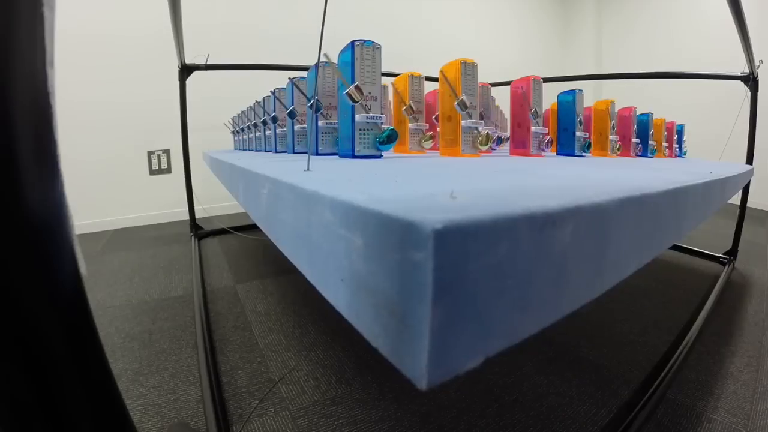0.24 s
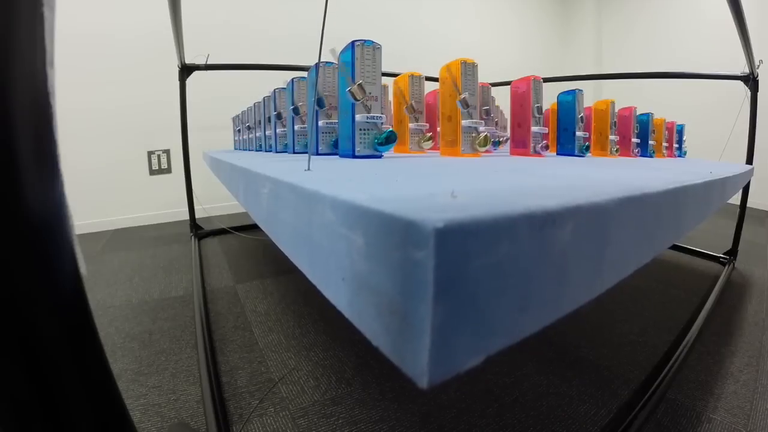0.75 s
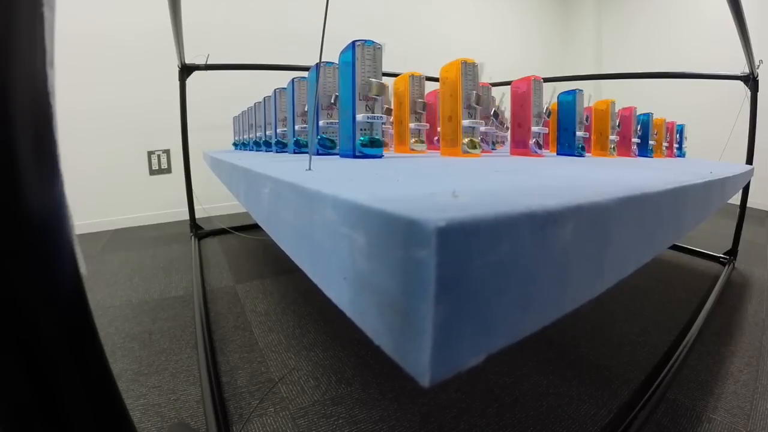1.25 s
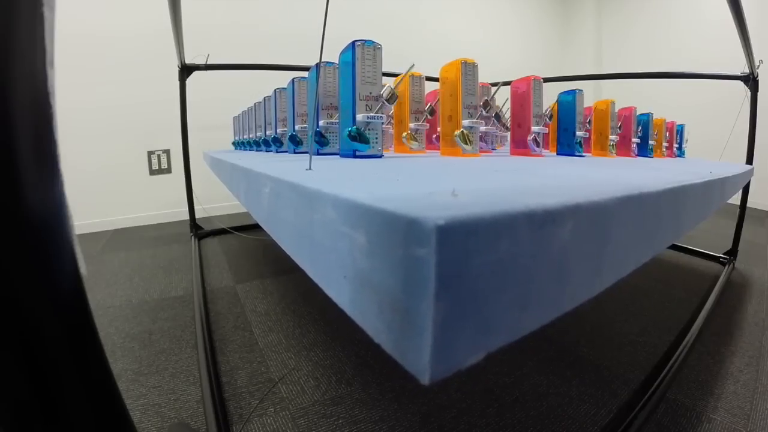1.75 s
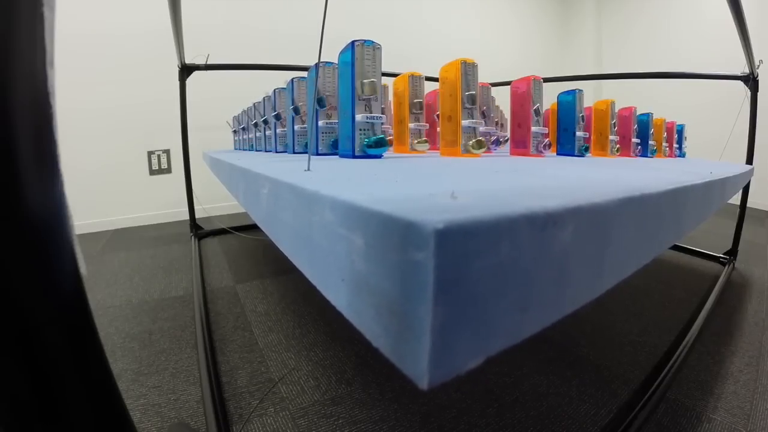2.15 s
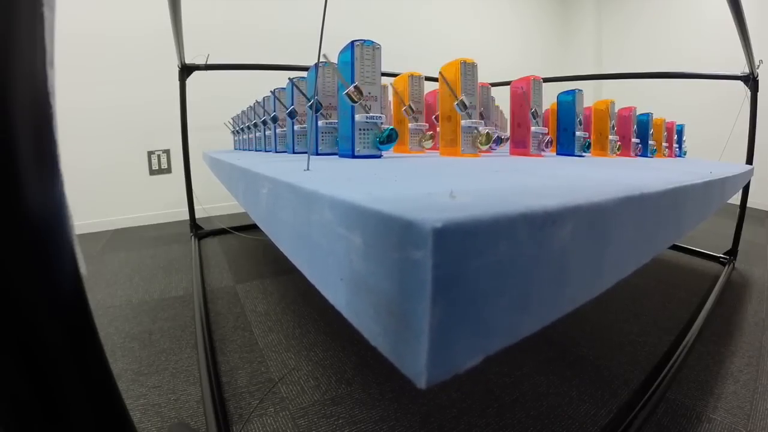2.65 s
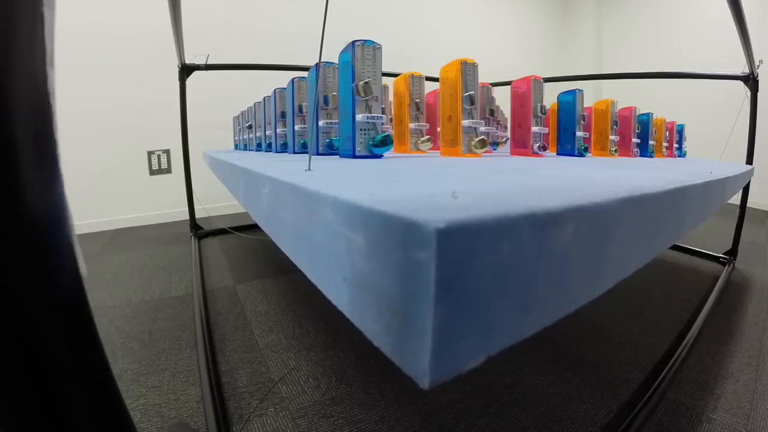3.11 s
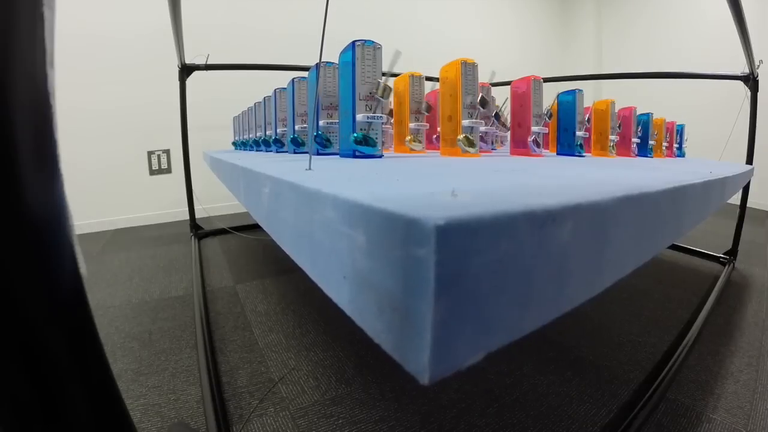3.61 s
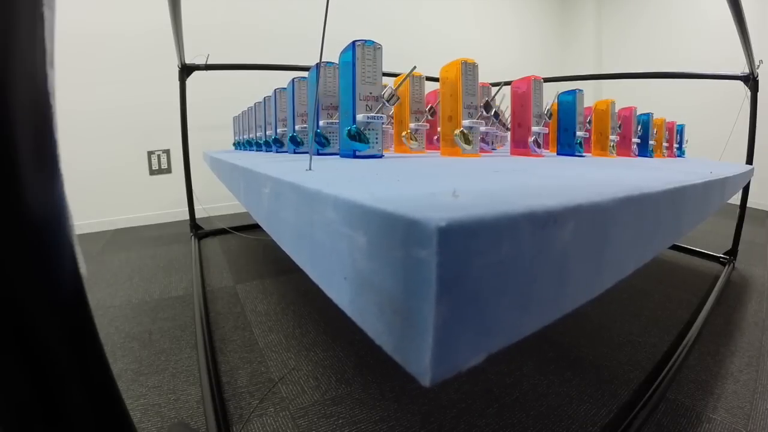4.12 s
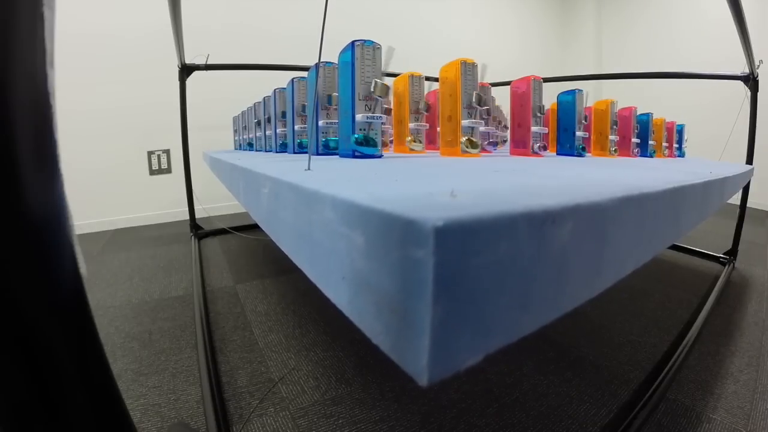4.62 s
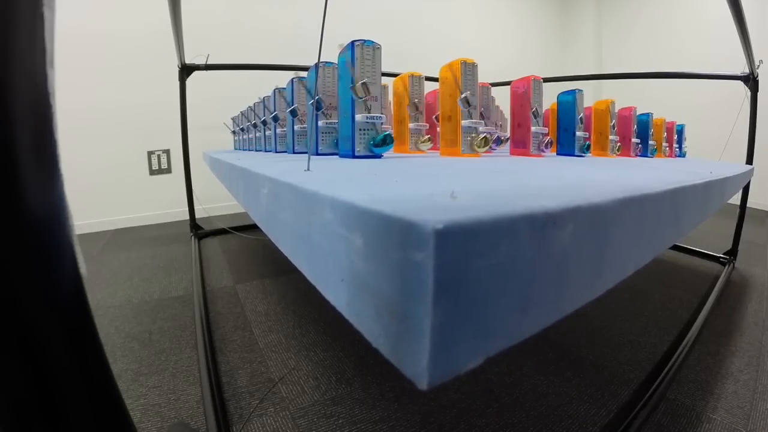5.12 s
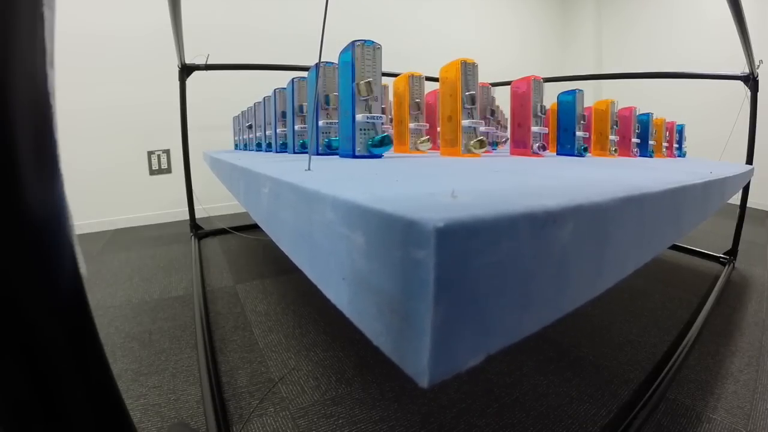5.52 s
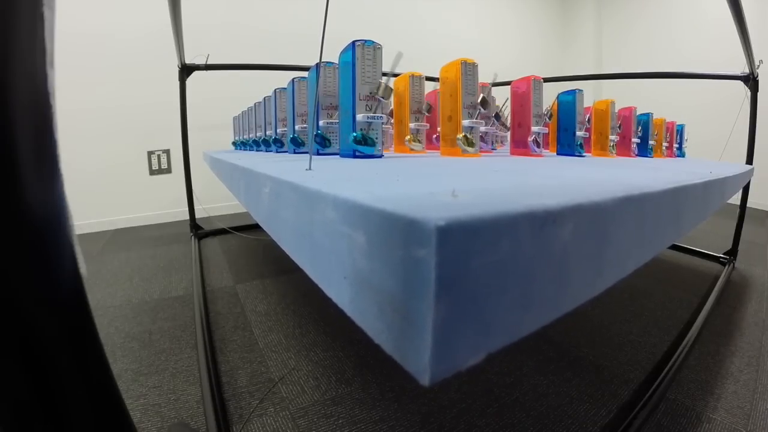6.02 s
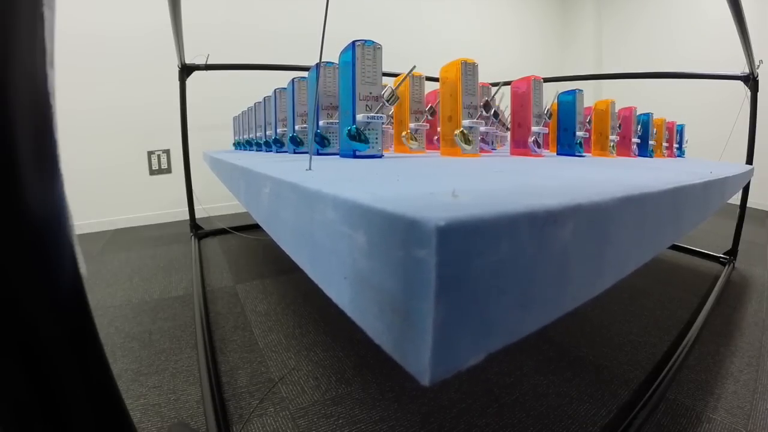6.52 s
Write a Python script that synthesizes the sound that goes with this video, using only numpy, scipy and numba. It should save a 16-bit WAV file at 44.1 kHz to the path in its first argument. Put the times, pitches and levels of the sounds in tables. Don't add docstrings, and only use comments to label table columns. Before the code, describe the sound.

Rows of small plastic pendulum metronomes on a hanging foam board tick nearly together, just over three beats a second. Each beat is a short clattering roll: a leading click, a dense crowd of ticks, then a lone straggler. Alternate beats differ slightly in leading accent. Close stereo microphones catch bright, dry clacks with short room echoes and soft ventilation noise beneath.

```python
import sys
import numpy as np
from scipy import signal
from scipy.fft import rfft, irfft, next_fast_len
from scipy.io import wavfile
from scipy.ndimage import uniform_filter1d, minimum_filter1d
from numba import njit

SR = 44100
rng = np.random.default_rng(int(sys.argv[2]) if len(sys.argv) > 2 else 0)


def attenuation_scalar(level_db):
    decades = np.asarray(level_db, float) / 20
    return 10 ** decades


def persist_wave(psi):
    counts = np.round(np.clip(psi, -1, 1) * 32767).astype(np.int16)
    wavfile.write(sys.argv[1], SR, np.atleast_2d(counts).T)


N = 297675
LEAD_IN = 4410

# leader_start_s, crowd_level_db, leader_level_db
BEATS = [(-0.0843, -13.5, -22), (0.2115, -14, -18), (0.5173, -13, -9.5), (0.815, -13, -16),
         (1.1205, -13.5, -8), (1.4185, -13, -12), (1.7216, -13.5, -10), (2.0194, -13.5, -19),
         (2.3248, -14, -10), (2.6218, -13.5, -18), (2.927, -13, -8.5), (3.2234, -13, -15.5),
         (3.5281, -13, -8.5), (3.8257, -12.5, -12.5), (4.1306, -13.5, -11), (4.4284, -12.5, -16),
         (4.731, -13, -12), (5.0283, -12.5, -15.5), (5.3345, -13.5, -6.5), (5.6305, -14.5, -16),
         (5.9377, -13.5, -8), (6.2335, -13, -14.5), (6.539, -13, -8)]
# after_leader_s, level_db
CROWD_SWELL = [
    (.018, -4.5),
    (0.033, -2),
    (.05, 0),
    (.095, -1.5),
    (.115, -3.5),
    (0.127, -4.5),
    (.138, -9.5),
]
# start_s, level_db
NEAREST = [(0.0005, -6.5), (0.2248, -5), (0.526, -6), (0.8223, -6.5), (1.127, -6), (1.434, -5),
           (1.7299, -5.5), (2.0331, -5), (2.3327, -4.5), (2.636, -6), (2.9326, -5), (3.2384, -5),
           (3.5383, -4.5), (3.8402, -4.5), (4.142, -3.5), (4.4367, -6), (4.7377, -5.5), (5.0392, -9.5),
           (5.3465, -7.5), (5.6418, -10.5), (5.9484, -3.5), (6.2428, -8), (6.5498, -3.5)]
# start_s, level_db
STRAGGLER = [(0.0494, -16), (0.3409, -9), (0.6515, -13), (0.945, -13.5), (1.2521, -17), (1.546, -17),
             (1.8523, -14), (2.149, -10), (2.455, -12), (2.753, -9), (3.0583, -19), (3.3548, -9),
             (3.6595, -12), (3.9567, -9.5), (4.2637, -11), (4.5596, -11), (4.8651, -13), (5.161, -11.5),
             (5.463, -8.5), (5.764, -10), (6.0722, -13.5), (6.365, -9.5), (6.6744, -12)]
# after_leader_s, slip_s_per_s, level_db, cavity_ring_db
SWING_RIGHT = [(.018, 0.0008, -7, -13), (.023, 0.00053, -13.5, -3), (.029, .0003, -21, 2),
               (.037, .0002, -14.5, -12.5), (.044, .0002, -8, -5), (.053, .0002, -12, 1),
               (.062, 0.00022, -16, 2), (.082, .0002, -7, -6.5), (.089, .0002, -12, -6),
               (.1, 0.00018, -12.5, -12), (.11, .0002, -14, -8.5), (.126, .0002, -17, -10.5),
               (.171, 0.00022, -30, 8)]
# after_leader_s, slip_s_per_s, level_db, cavity_ring_db
SWING_LEFT = [(.008, 0.001, -11, -5), (.021, 0.0032, -10.5, -6), (.027, .0003, -16, -3),
              (.031, -0.0048, -13, -8), (.043, .0002, -9, -3.5), (.049, -.0003, -13.5, -3.5),
              (.058, .0002, -12.5, -3), (.074, .0002, -11.5, 0.5), (.084, .0002, -12.5, -6),
              (.092, .0002, -9.5, -12), (.102, .0002, -12, -6), (.112, .0002, -15, -8),
              (.122, .0002, -21.5, -10), (.174, .0001, -28.5, 8.5)]
# pitch_hz, level_db, t60_s
CASE_MODES = [(2350, -6, .03), (2780, -2, .03), (3300, -2, .025), (3850, -3, .025), (4400, -5, .02),
              (4900, -5, .02), (5500, -7, .02), (6100, -4, .02), (6750, -4, .02), (8450, -5, .009),
              (9300, -10, .008)]
# pitch_hz, level_db, t60_s
COMMON_CAVITY = (1860, 5.24, 0.06)
# pitch_hz, level_db, t60_s, thinning_out_s
DEEP_CAVITY = (1590, 0.92, 0.16, 0.057)
# freq_hz, level_db
CRACK = [(200, -58), (550, -13.5), (1100, -23.5), (2000, -3), (3500, -6), (6800, -8.5), (7700, -13.5),
         (8500, -10.5), (11900, -29), (16000, -41)]
# freq_hz, gain_db
REACH = [(40, -46), (130, -23), (260, -7.5), (500, -3.5), (14000, 1.5), (16000, -10)]
# freq_hz, level_db, t60_s, side_minus_mid_db
ROOM = [(60, 5, .6, -32), (157, 11, 1, -31), (314, 6, 0.88, -23), (548, 9, 0.51, -16.5),
        (1034, -3, 0.41, -9.5), (1930, -0.5, 0.33, -7.5), (3140, 1, 0.28, -10.5), (5140, -3.5, 0.27, -14),
        (8500, -0.5, 0.17, -7.5), (12100, 2.5, 0.18, -13.5)]
# freq_hz, level_db_per_hz
AIR = [(25, -22), (40, -22), (56, 0.5), (100, -2.5), (160, 1), (300, 3.5), (600, -12.5), (1500, -10),
       (5000, -12), (16000, -29.5)]
# centre_s, pitch_hz, level_db, half_length_s
THUDS = [
    (3.22, 92, -44.5, 0.081),
    (3.4, 99, -53, 0.044),
    (4.145, 60, -51.5, 0.063),
    (6.497, 54.9, -53, 0.075),
]


def colour(x, hz, db):
    size = next_fast_len(x.shape[-1])
    f = np.maximum(np.fft.rfftfreq(size, 1 / SR), 1)
    gain = attenuation_scalar(np.interp(np.log(f), np.log(hz), db))
    return irfft(rfft(x, size) * gain, size)[..., :x.shape[-1]]


def front_row(beat_s, row):
    wander_s, wander_db, wander_ring_db = .0015, 2, 3
    late_s, slip, db, ring_db = np.transpose(row)
    chance = np.clip(rng.standard_normal((len(beat_s), 3, len(row))), -2, 2)
    drift_s = slip * (beat_s[:, None] - beat_s.mean())
    s = beat_s[:, None] + late_s + drift_s + wander_s * chance[:, 0]
    level_db = db + wander_db * chance[:, 1]
    cavity_db = ring_db + wander_ring_db * chance[:, 2]
    return np.c_[s.ravel(), level_db.ravel(), cavity_db.ravel()]


def roll(count=44):
    beat_s, crowd_db, leader_db = np.transpose(BEATS)
    leaders = np.c_[beat_s + .0003, leader_db - 2.5, -5.0 - leader_db]

    nearest = np.c_[NEAREST, np.full(len(NEAREST), -8.5)]
    straggler = np.c_[STRAGGLER, np.full(len(STRAGGLER), -2.5)]
    right = front_row(beat_s[::2], SWING_RIGHT)
    left = front_row(beat_s[1::2], SWING_LEFT)
    loud = np.r_[nearest, straggler, right, left] + [-.0004, -3.0, 6.0]

    late_s, late_db = np.transpose(CROWD_SWELL)
    chance = rng.standard_normal((len(beat_s), 2, count))
    place = np.linspace(late_s[0], late_s[-1], count) + .003 * chance[:, 0]
    place = np.clip(place, late_s[0], late_s[-1])
    db = crowd_db[:, None] - 0.5 + np.interp(place, late_s, late_db) + 0.78 * chance[:, 1]
    crowd = np.c_[(beat_s[:, None] + place).ravel(), db.ravel(), np.zeros(db.size)]

    ticks = np.r_[leaders, loud, crowd]
    own_beat = np.searchsorted(beat_s, ticks[:, 0]) - 1
    return np.c_[ticks, ticks[:, 0] - beat_s[own_beat]]


@njit
def ring(start, size, share, turn, length, total):
    out = np.zeros((total, share.shape[1]))
    for j in range(len(start)):
        for m in range(len(length)):
            z = size[j, m] + 0j
            for i in range(start[j], min(start[j] + length[m], total)):
                for path in range(share.shape[1]):
                    out[i, path] += share[j, path] * z.imag
                z *= turn[j, m]
    return out.T


def metronomes(rattle_s=.0009, count=3, channels=3):
    s, db, ring_db, late = roll().T
    total = N + LEAD_IN
    leaders = len(BEATS)
    hz, mode_db, t60 = np.transpose(CASE_MODES + [COMMON_CAVITY, DEEP_CAVITY[:3]])

    own = rng.standard_normal((len(s), 2, len(hz)))
    own[:leaders, :, -2:] *= 0.53
    pitch_spread = np.r_[np.full(len(CASE_MODES), .05), .022, .025]
    level_spread_db = np.r_[np.full(len(CASE_MODES), 3.5), 1.5, 1.5]
    pitch = hz * (1 + pitch_spread * own[:, 0])
    pitch[:, -1] *= 1 + 0.62 * late
    turn = np.exp(2j * np.pi * pitch / SR - np.log(1000) / (t60 * SR))
    turn[:leaders, -1] *= attenuation_scalar(-60 / (.08 * SR))

    level_db = db[:, None] + mode_db + level_spread_db * own[:, 1]
    level_db[:, -1] += ring_db - 10.6 * late / DEEP_CAVITY[3]
    level_db[:, -2] += ring_db - 12 * np.exp(-late / 0.0028)

    bounce = rng.random((len(s), count, 2))
    order = np.arange(count)
    blow_s = s[:, None] + rattle_s * (order + bounce[..., 0] * (order > 0))
    blows = LEAD_IN + (SR * blow_s).astype(int)
    strength = attenuation_scalar(-3.0 * order) * np.sign(bounce[..., 1] - .5)
    size = strength[..., None] * attenuation_scalar(level_db - 12.5)[:, None]
    size[:, 1:, -2:] *= attenuation_scalar(-11)
    size[..., -2:] *= attenuation_scalar(2.24)
    size = size.reshape(-1, len(hz))

    share = np.c_[np.ones(len(s)), np.sign(rng.standard_normal((len(s), channels - 1)))]
    share = np.repeat(share, count, axis=0)
    turn = np.repeat(turn, count, axis=0)
    length = (.9 * t60 * SR).astype(int)
    cases = ring(blows.ravel(), size, share, turn, length, total)

    blow_power = attenuation_scalar(2 * db)[:, None] * strength ** 2
    power = np.bincount(blows.ravel(), blow_power.ravel(), total + SR)[:total]
    envelope = np.sqrt(signal.lfilter([1], [1, -np.exp(-1 / (0.0012 * SR))], power))
    crack = colour(envelope * rng.standard_normal(cases.shape), *np.transpose(CRACK))
    return colour(cases + attenuation_scalar(10.0) * crack, *np.transpose(REACH))


def room(paths, length_s=.45, build_s=0.0015):
    hz, db, t60, side_db = np.transpose(ROOM)
    t = np.arange(int(length_s * SR)) / SR
    log_f = np.log(np.maximum(np.fft.rfftfreq(len(t), 1 / SR), 1))
    noise = rfft(rng.standard_normal((len(paths), 2, len(t))))
    echoes = 0
    for k, alone in enumerate(np.eye(len(hz))):
        band = irfft(noise * np.interp(log_f, np.log(hz), alone), len(t))
        level = attenuation_scalar([[db[k]], [db[k] + side_db[k]]]) / np.sqrt(t60[k] * SR / 6)
        echoes = echoes + band * level * attenuation_scalar(-60 * t / t60[k])
    echoes = echoes * (1 - np.exp(-t / build_s))
    wet = signal.fftconvolve(paths[:, None], echoes, axes=2)
    return wet[..., :paths.shape[1]].sum(axis=0)


def air(level_db=-49.5, swell_db=2.0, swell_s=0.13):
    t = np.arange(N) / SR
    hz, _, _, side_db = np.transpose(ROOM)
    hiss = colour(rng.standard_normal((2, N)), *np.transpose(AIR))
    knots = np.arange(0, t[-1] + 1, swell_s)
    swell = np.interp(t, knots, rng.standard_normal(len(knots)))
    hiss = hiss * attenuation_scalar(level_db + swell_db * swell) / hiss.std()
    hiss[1] = colour(hiss[1], hz, side_db + 6.0)
    for s, thud_hz, db, half_s in THUDS:
        swelling = np.exp(-((t - s) / half_s) ** 2)
        hiss[0] += attenuation_scalar(db) * swelling * np.sin(2 * np.pi * thud_hz * t)
    return hiss


def scene():
    hz, _, _, side_db = np.transpose(ROOM)
    paths = metronomes()
    direct = np.array([paths[0], colour(paths[1], hz, side_db - 5.5)])
    ticking = direct + attenuation_scalar(-3.5) * room(paths)
    mid, side = ticking[:, LEAD_IN:] + air()
    return np.array([mid + side, mid - side])


def roll_off(x):
    return signal.sosfilt(signal.butter(12, 16480, fs=SR, output="sos"), x)


def record(dry, narrow_hz=4400, loud_db=-24, lag_s=0.033):
    left, right = np.tanh(0.88 * dry) / 0.96
    mid, side = (left + right) / 2, (left - right) / 2

    lag = int(lag_s * SR)
    power = uniform_filter1d(mid ** 2, lag // 2)
    lasting = minimum_filter1d(power, lag, origin=(lag - 1) // 2)
    fold = uniform_filter1d(1. * (lasting > attenuation_scalar(2 * loud_db)), lag // 4)
    treble = colour(side, [0.16 * narrow_hz, narrow_hz], [-60, 0])
    side = side - 0.59 * fold * treble

    side = colour(side, [50, 250], [-14, 0])
    mid = colour(mid, [18, 40], [-9, 0])
    top_cut = signal.ellip(10, .2, 70, 15800, fs=SR, output="sos")
    mix = signal.sosfiltfilt(top_cut, [mid + side, mid - side])
    return roll_off(mix)


dry = scene()
out = record(dry)
persist_wave(out)
```